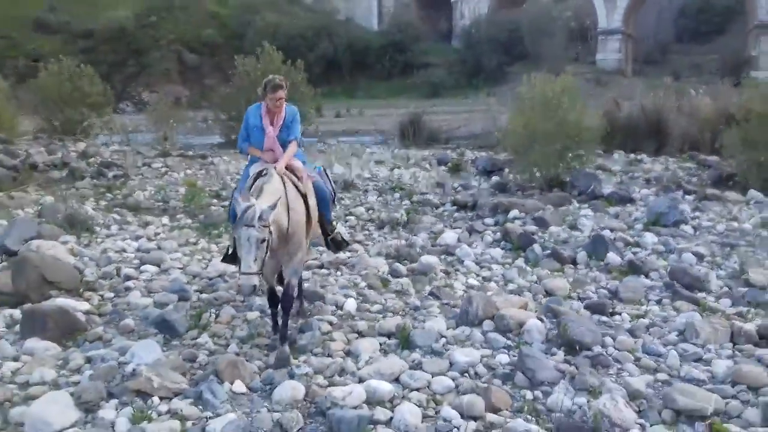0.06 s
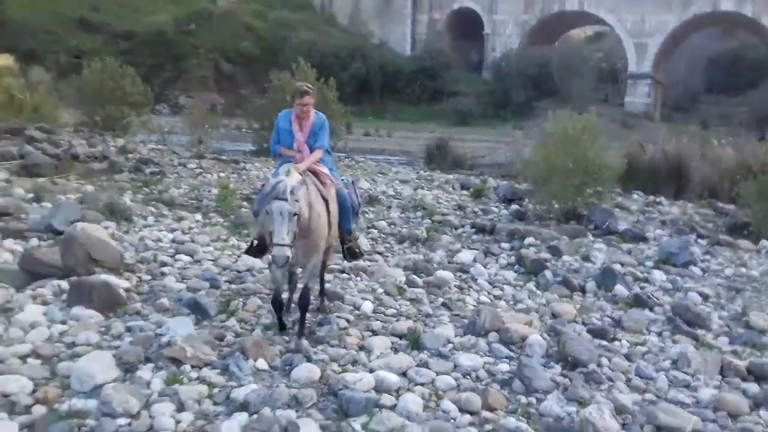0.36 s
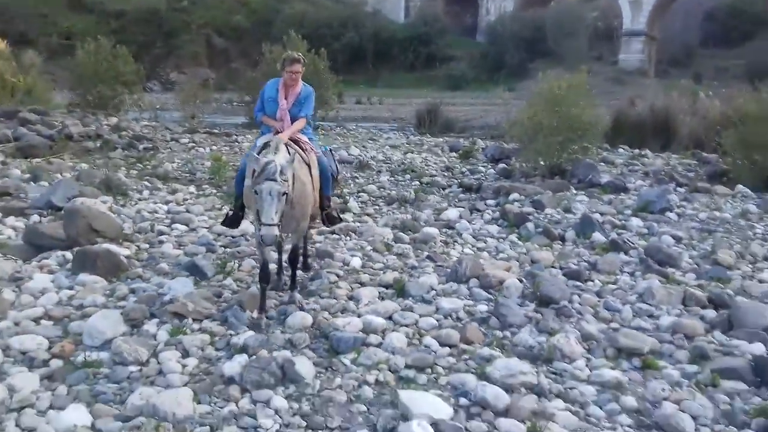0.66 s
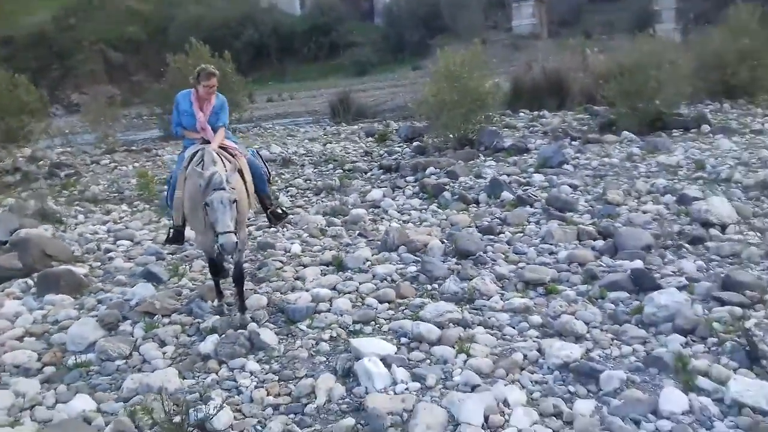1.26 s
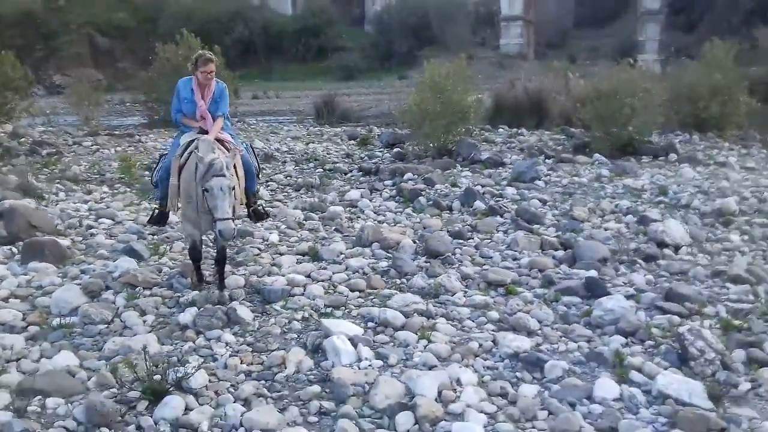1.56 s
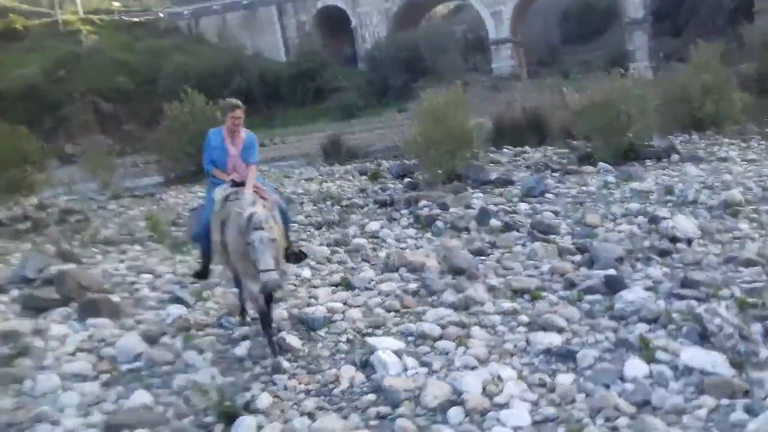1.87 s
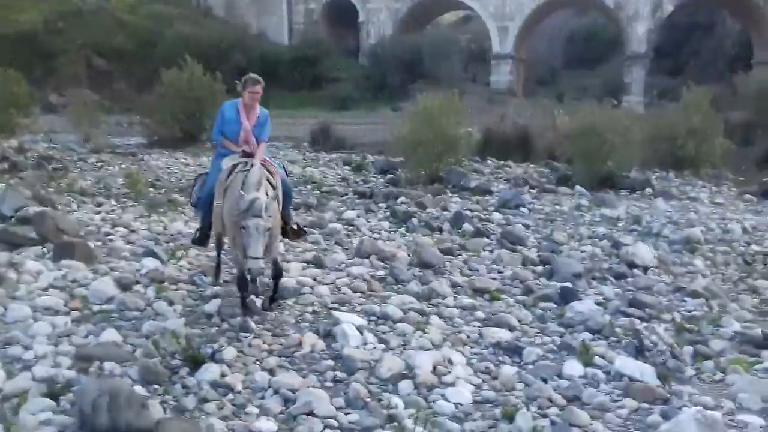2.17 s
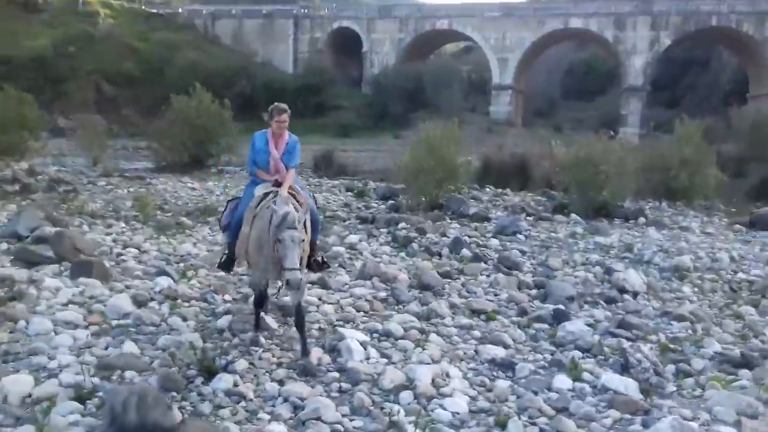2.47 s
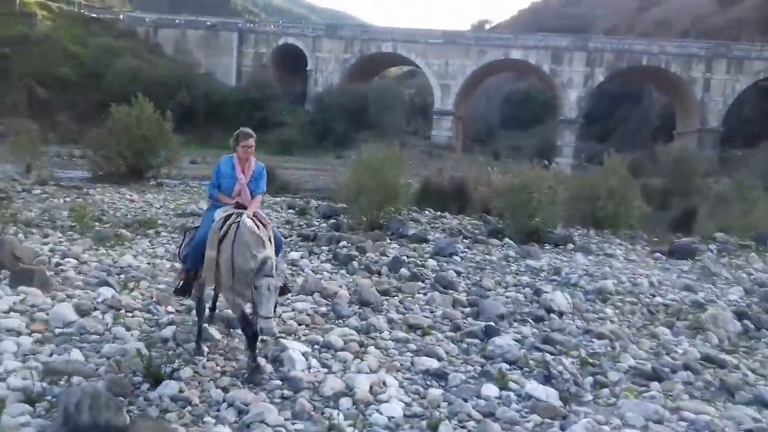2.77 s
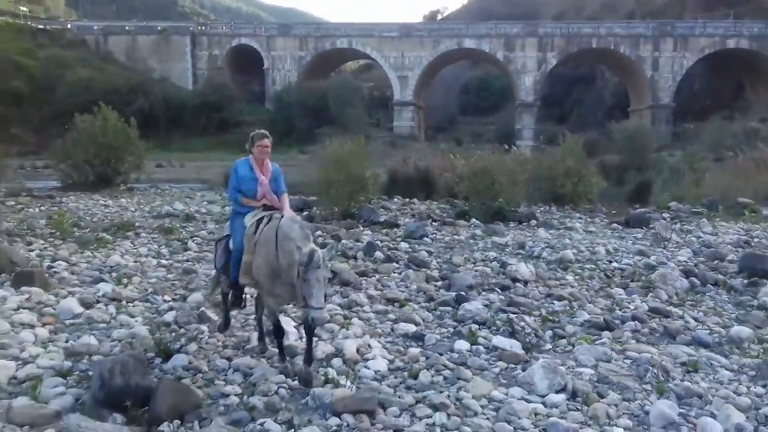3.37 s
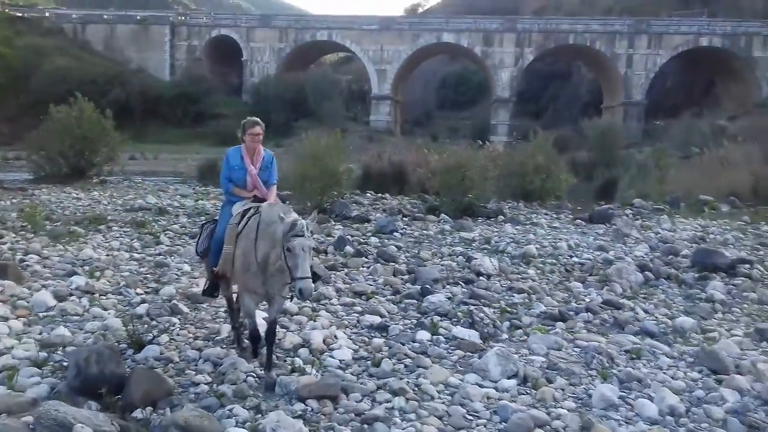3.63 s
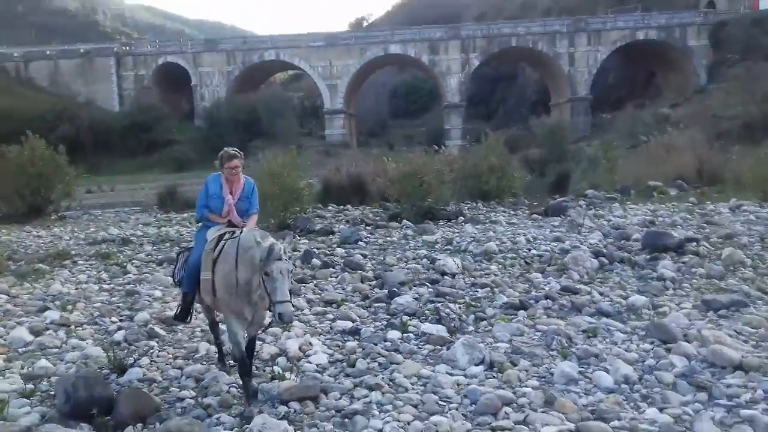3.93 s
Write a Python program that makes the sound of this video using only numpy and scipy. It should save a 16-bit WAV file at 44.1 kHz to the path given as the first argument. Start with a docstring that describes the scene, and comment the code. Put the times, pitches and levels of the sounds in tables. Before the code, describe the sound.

A horse walks over loose cobbles in a dry riverbed a few metres away, its hooves making irregular clacks and gritty crunches. Pebbles tick and settle between steps while gusts of wind buffet the microphone over a soft outdoor hush.

```python
"""A dry riverbed in the open air: a horse walks over loose cobbles a few metres away.
Each hoof knocks stones together, thuds into the bed and grinds the grit underneath.
Pebbles keep settling between steps, and the field of stones scatters a short, faint echo.
Gusts of wind buffet the microphone over a soft open-air hush."""
import sys
import numpy as np
from scipy import signal
from scipy.fft import rfft, irfft
from scipy.io import wavfile
from scipy.ndimage import uniform_filter1d

SR = 44100
rng = np.random.default_rng(int(sys.argv[2]) if len(sys.argv) > 2 else 0)


def wrap_up_sound(samples):
    """Save the sound to the file named by the first command line argument, as 16-bit audio."""
    columns = np.atleast_2d(samples).T
    # keep every value between -1 and 1, then stretch to whole-number steps
    tamed = np.clip(columns, -1, 1)
    steps = np.round(tamed * 32767).astype(np.int16)
    wavfile.write(sys.argv[1], SR, steps)


N = 176400


def amp(db):
    """Decibels to gain."""
    return 10 ** (np.asarray(db) / 20)


def unit(x):
    """Scales to rms 1."""
    return x / np.sqrt(np.mean(x ** 2) + 1e-20)


def add(mix, start_s, sound):
    """Drops a sound into the mix at a cue time."""
    part = mix[max(0, round(start_s * SR)):][:len(sound)]
    part += sound[:len(part)]


def colour(x, curve):
    """Applies an EQ curve of (freq_hz, gain_db) points; rms 1."""
    hz, db = np.transpose(curve)
    gain = amp(np.interp(np.log(np.fft.rfftfreq(N, 1 / SR) + 1), np.log(hz), db))
    return unit(irfft(rfft(x) * gain, N))


def steady(x, size):
    """Rides the level over a window of samples, keeping the finer grain."""
    power = uniform_filter1d(uniform_filter1d(x ** 2, size), size)
    return x / np.sqrt(abs(power) + 1e-9)


def ring(hz, cycles):
    """A stone's heavily damped ring, its envelope peaking after the given cycles."""
    turns = hz * np.arange(SR // 20) / SR
    envelope = (turns / cycles * np.exp(1 - turns / cycles)) ** 2
    return envelope * np.sin(2 * np.pi * turns)


def contacts(per_s, spread_db):
    """Random clicks, most of them small."""
    size = amp(spread_db * np.minimum(rng.exponential(1, N), 4))
    return size * rng.choice([-1, 1], N) * (rng.random(N) < per_s / SR)


# Stone-on-stone hits: start_s, level_db, pitch_hz
CLACKS = [(0.0519, -12, 3480), (0.1914, 1.5, 1540), (0.2117, -1.5, 1000), (0.239, -3, 2770),
          (0.2727, -4.5, 2400), (0.358, -1, 2220), (0.3861, 0, 1920), (0.4303, 0, 1570), (0.4641, -2, 1600),
          (0.542, -5.5, 1730), (0.7164, -5.5, 2760), (1.1281, -6.5, 1450), (1.1115, -7.5, 1770),
          (1.1323, -3.5, 1470), (1.2463, -4.5, 980), (1.2745, 0, 2460), (1.311, -11.5, 1860),
          (1.6118, -11.5, 1470), (1.6403, -4, 1710), (1.6482, 0, 1540), (1.681, -5, 1270),
          (1.705, -6, 3250), (1.7695, -3.5, 1380), (1.8896, -6, 1660), (2.086, 5, 1860),
          (2.1089, -1.5, 1310), (2.1529, -10, 1130), (2.2363, -3, 2180), (2.2698, -0.5, 1800),
          (2.3413, -5.5, 1720), (2.4282, -4, 1300), (2.495, -11, 1900), (2.5827, -9.5, 2150),
          (2.609, 3, 1110), (2.6417, 3.5, 3500), (2.6952, -2, 1660), (2.8081, -2.5, 1830),
          (2.8831, -12, 1630), (3.0051, -9.5, 2150), (3.0633, -15.5, 2100), (3.1655, -6.5, 1600),
          (3.311, -5.5, 1470), (3.3242, -11.5, 1940), (3.5519, -11, 1940), (3.632, -5, 1900),
          (3.6441, -8, 1830), (3.6518, -6, 1590), (3.8944, -6.5, 1360), (3.951, -4.5, 1610)]

def clacks():
    """A wedged stone knocks, then chatters briefly against its neighbours."""
    chatter_decay_s, chatter_db, chatter_octaves = 0.0048, -4.5, 0.52
    out, t = np.zeros(N), np.arange(SR // 20) / SR
    freqs = np.fft.rfftfreq(len(t), 1 / SR) + 1
    for start_s, level_db, pitch_hz in CLACKS:
        knock = ring(pitch_hz, cycles=0.51)
        band = np.exp(-.5 * (np.log2(freqs / pitch_hz) / chatter_octaves) ** 2)
        chatter = irfft(rfft(rng.standard_normal(len(t))) * band, len(t))
        chatter *= np.minimum(t * pitch_hz / 2, 1) * np.exp(-t / chatter_decay_s)
        chatter *= amp(chatter_db) * np.linalg.norm(knock) / np.linalg.norm(chatter)
        add(out, start_s, amp(level_db) * (knock + chatter))
    return out


# Pings of loose stones: start_s, level_db, pitch_hz
CLINKS = [(0.1113, -10, 3850), (0.499, -2, 2240), (1.2743, -0.5, 2480), (1.5005, -6.5, 1630),
          (1.7035, -15, 2000), (1.7172, -11.5, 3860), (1.784, -15, 3800)]

def clinks(decay_s=0.0016):
    """A loose stone is free to ring on for a moment at one pitch."""
    out, t = np.zeros(N), np.arange(SR // 20) / SR
    for start_s, level_db, pitch_hz in CLINKS:
        envelope = np.tanh(t * pitch_hz) * np.exp(-t / decay_s)
        add(out, start_s, amp(level_db) * envelope * np.sin(2 * np.pi * pitch_hz * t))
    return out


# Crunches under the hoof: start_s, length_s, level_db, extra_grit_db
SCRAPES = [(0.0, 0.022, -24, 4), (0.044, 0.062, -26.5, 10), (0.331, 0.055, -19.5, -4),
           (0.59, 0.063, -23.5, -7), (0.711, 0.036, -31, -2), (0.803, 0.15, -37, -3),
           (1.122, 0.0086, -22, -1), (1.205, 0.038, -25, -7), (1.264, 0.027, -26, 1),
           (1.674, 0.049, -32, -0.5), (1.737, 0.087, -21, -12), (1.874, 0.028, -26.5, 5.5),
           (2.027, 0.015, -27, -3.5), (2.076, 0.031, -21.5, -5.5), (2.232, 0.087, -27.5, -1.5),
           (2.347, 0.067, -26, 0.5), (2.61, 0.037, -22.5, -1.5), (2.707, 0.054, -26.5, -0.5),
           (3.362, 0.026, -36.5, -1.5), (3.849, 0.014, -28.5, -4)]

def scrapes():
    """A hoof thuds into the bed and stones slip in dense crackles; finer grit swells and trails off."""
    attack_s, release_s, sag_db = 0.0043, 0.0096, -1.5
    thud_hz, thud_db = 467, -9
    t, stone_gain, grit_gain = np.arange(N) / SR, np.zeros(N), np.zeros(N)
    for start_s, length_s, level_db, extra_grit_db in SCRAPES:
        age = np.maximum(t - start_s, 0)
        progress = age / length_s
        load = np.minimum(age / attack_s, 1) * np.exp(-np.maximum(age - length_s, 0) / release_s)
        stone_gain += load * amp(level_db + sag_db * np.minimum(progress, 1))
        grit_gain += np.sqrt(progress) * np.exp(-progress ** 2) * amp(level_db + extra_grit_db)
    thud_band = signal.butter(2, [thud_hz / 2, thud_hz * 2], "band", fs=SR)
    thud = unit(signal.lfilter(*thud_band, rng.standard_normal(N)))
    crackle = steady(pebbles(per_s=1200, spread_db=4.5), size=1000)
    return stone_gain * (crackle + amp(thud_db) * thud) + grit_gain * gravel()


def settling():
    """Pebbles stirred by each scrape keep ticking, and fine grit rustles between the steps."""
    stir_db, grit_db, floor_db, decay_s = -17, -4.5, -44.5, 0.32
    t, stone_power, grit_power = np.arange(N) / SR, np.zeros(N), np.zeros(N)
    for start_s, _, level_db, extra_grit_db in SCRAPES:
        stir = amp(level_db + stir_db) ** 2 * (t > start_s) * np.exp(-2 * abs(t - start_s) / decay_s)
        stone_power += stir
        grit_power += stir * amp(extra_grit_db + grit_db) ** 2
    stones = pebbles(per_s=260, spread_db=4)
    return np.sqrt(stone_power + amp(floor_db) ** 2) * stones + np.sqrt(grit_power) * gravel()


def pebbles(per_s, spread_db, centre_hz=1650, octaves=0.48, count=14):
    """Random contacts, each ringing one of many stones of different size."""
    hits, struck = contacts(per_s, spread_db), rng.integers(0, count, N)
    rank = (np.arange(count) + .5) / count
    pitches = centre_hz * 2 ** (octaves * .5 * np.log(rank / (1 - rank)))  # bunched near the centre
    return unit(sum(signal.oaconvolve(hits * (struck == k), ring(hz, cycles=1.44))[:N]
                    for k, hz in enumerate(pitches)))


# Bright EQ of fine grit: freq_hz, gain_db
GRIT_EQ = [(700, -6), (3900, -0.5), (6100, -14), (7300, -27.5), (9200, -25), (10700, -43), (13500, -27),
           (16000, -41)]

def gravel(tick_db=-2.5, spurt_db=6.5):
    """Grit slips in uneven spurts: a sandy crackle with ticks of small chips."""
    sand = steady(colour(contacts(per_s=3700, spread_db=3), GRIT_EQ), size=500)
    ticks = steady(pebbles(per_s=600, spread_db=4.5, centre_hz=3590, octaves=0.24), size=1400)
    spurts = unit(uniform_filter1d(rng.standard_normal(N), size=260))
    return unit((sand + amp(tick_db) * ticks) * amp(spurt_db * np.minimum(spurts, 2)))


def grit_spray(level_db=-40, decay_s=0.0057):
    """Every knock, light or heavy, throws the same tiny, bright spray of grit."""
    envelope, t = np.zeros(N), np.arange(SR // 20) / SR
    for start_s, _, _ in CLACKS:
        add(envelope, start_s, np.exp(-t / decay_s))
    return amp(level_db) * envelope * colour(rng.standard_normal(N), GRIT_EQ)


def riverbed_echo(x, t60_s=0.089, wet_db=-14):
    """The stones all around scatter the sound, adding a faint, short tail."""
    t = np.arange(SR // 2) / SR
    tail = rng.standard_normal(len(t)) * np.exp(-np.log(1000) * t / t60_s)
    return x + amp(wet_db) * signal.oaconvolve(x, tail / np.linalg.norm(tail))[:N]


# Gusts on the microphone: centre_s, length_s, level_db
GUSTS = [(0.122, 0.1, -23.5), (0.33, 0.16, -32), (0.543, 0.033, -16), (0.632, 0.059, -19),
         (0.76, 0.013, -16.5), (0.818, 0.094, -13.5), (1.204, 0.16, -31.5), (1.635, 0.086, -28),
         (1.87, 0.22, -34), (2.468, 0.044, -26), (2.571, 0.039, -18.5), (2.662, 0.019, -11.5),
         (2.774, 0.083, -21), (2.836, 0.013, -12), (2.942, 0.1, -23.5), (3.187, 0.038, -17),
         (3.304, 0.16, -24.5), (3.555, 0.15, -22.5), (3.711, 0.14, -20.5)]
# EQ of the wind's low rumble: freq_hz, gain_db
RUMBLE_EQ = [(170, -1.5), (350, -13), (2000, -91)]
# EQ of the wind's low-mid flutter: freq_hz, gain_db
FLUTTER_EQ = [(130, -18.5), (290, -0.5), (460, -4.5), (900, -21.5), (4000, -86)]

def wind():
    """Gusts break into rounded puffs on the microphone: a low rumble with a higher flutter on top."""
    breeze_db, eddy_hz, eddy_db = -44, 22.7, 3.5
    rumble_db, flutter_db, flutter_growth = 2, 6, 1.531  # growth above 1 makes strong gusts brighter
    t, rate = np.arange(N) / SR, np.fft.rfftfreq(N, 1 / SR) / eddy_hz
    power = np.full(N, amp(breeze_db) ** 2)
    for centre_s, length_s, level_db in GUSTS:
        power += amp(level_db) ** 2 * np.exp(-(2 * (t - centre_s) / length_s) ** 2)
    eddy_band = rate ** 2 * np.exp(-rate ** 2)
    eddies = steady(irfft(rfft(rng.standard_normal(N)) * eddy_band, N), size=3000)
    force = np.sqrt(power) * amp(eddy_db * eddies)
    rumble = steady(colour(rng.standard_normal(N), RUMBLE_EQ), size=600)
    flutter = steady(colour(rng.standard_normal(N), FLUTTER_EQ), size=600)
    return amp(rumble_db) * force * rumble + amp(flutter_db) * force ** flutter_growth * flutter


# EQ of the open-air hush: freq_hz, gain_db
AIR_EQ = [(500, 0.5), (3900, -15), (7000, -45.5), (16000, -53)]

def air(level_db=-48.5):
    """A soft, even bed of open-air hush."""
    return amp(level_db) * colour(rng.standard_normal(N), AIR_EQ)


def scene():
    """Hooves on cobbles up front, with wind and hush around them, in mono."""
    treble_cut = signal.butter(4, 4900, fs=SR)  # little of the knocks' top end carries
    knocks = signal.lfilter(*treble_cut, clacks() + clinks())
    hooves = riverbed_echo(knocks + grit_spray() + scrapes() + settling())
    return (hooves + wind() + air())[None]


def record(dry):
    """The microphone's bass cut, a soft ceiling on the loudest peaks, and the band limit."""
    low_cut_hz, high_cut_hz = 99, 16200
    cut = signal.lfilter(*signal.butter(2, low_cut_hz, "high", fs=SR), dry)
    soft = cut / (1 + cut ** 4) ** .25
    band_limit = signal.firwin(511, high_cut_hz, window=("kaiser", 9), fs=SR)
    return signal.oaconvolve(soft, band_limit[None], "same")


dry = scene()
out = record(dry)
wrap_up_sound(out)
```